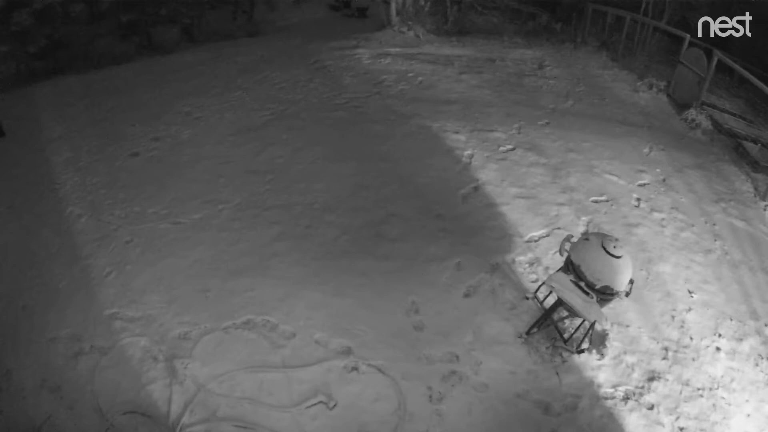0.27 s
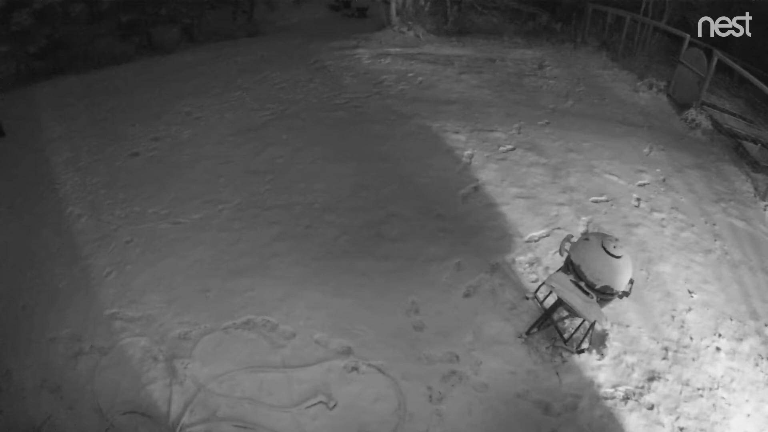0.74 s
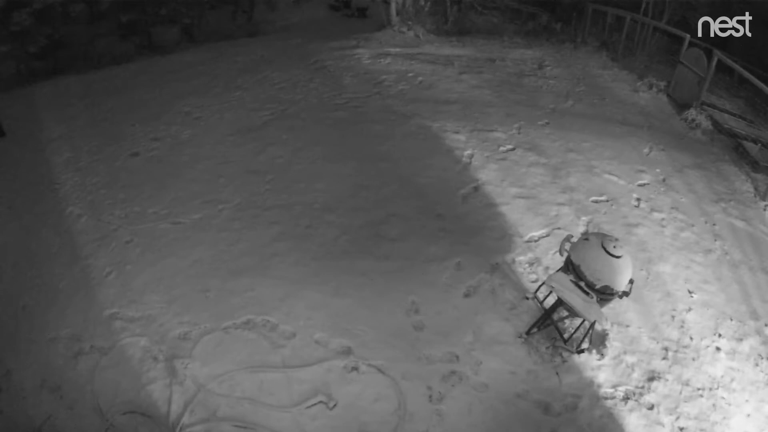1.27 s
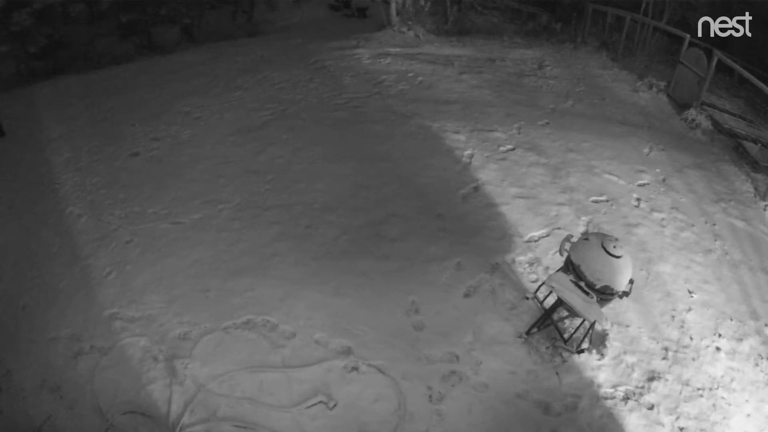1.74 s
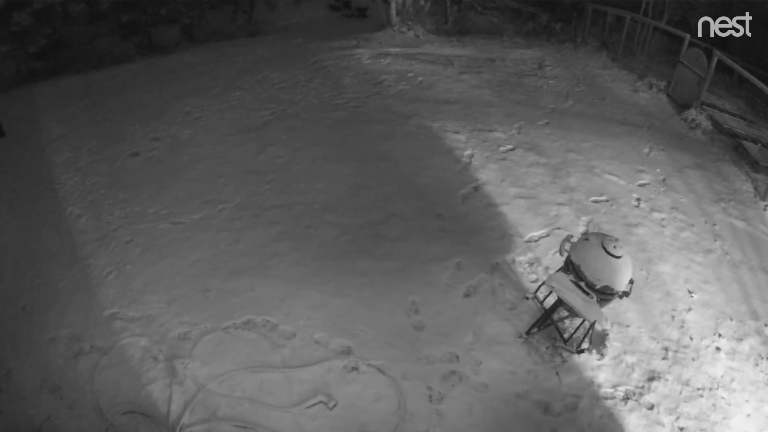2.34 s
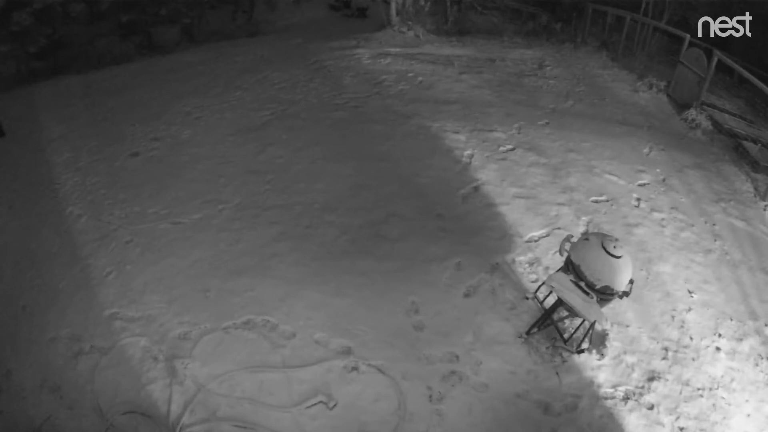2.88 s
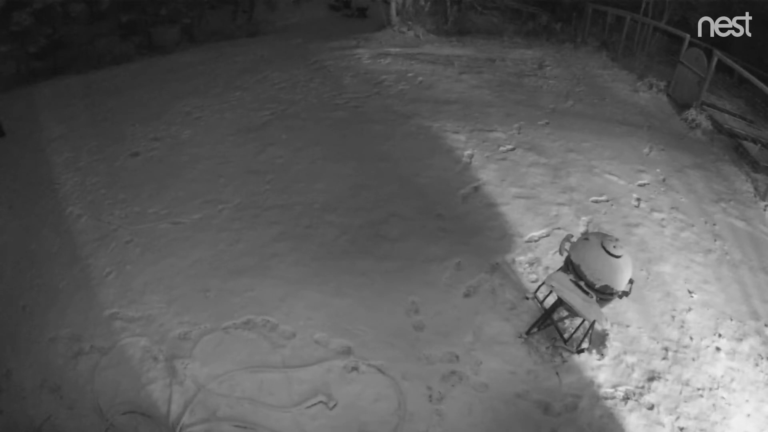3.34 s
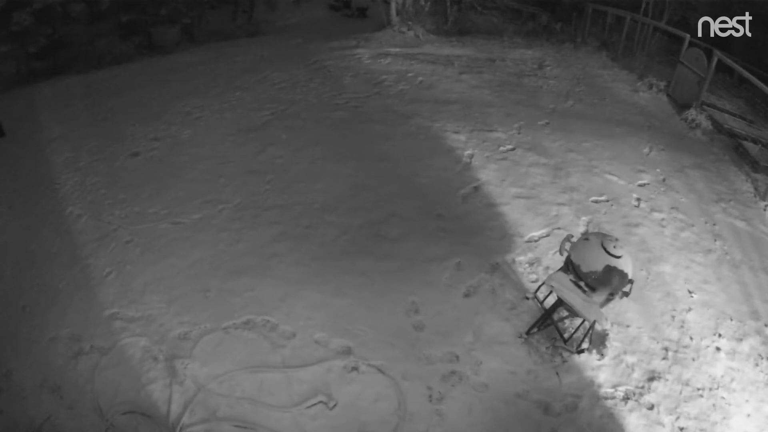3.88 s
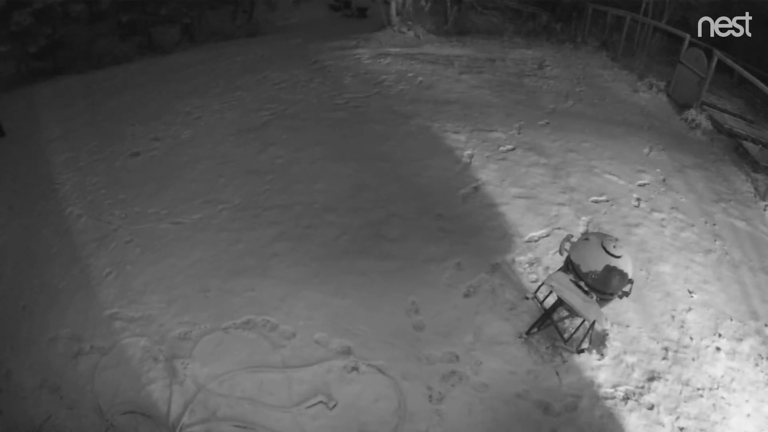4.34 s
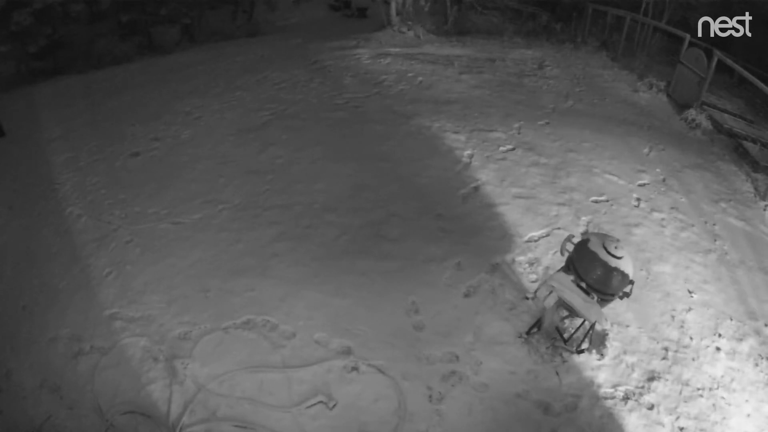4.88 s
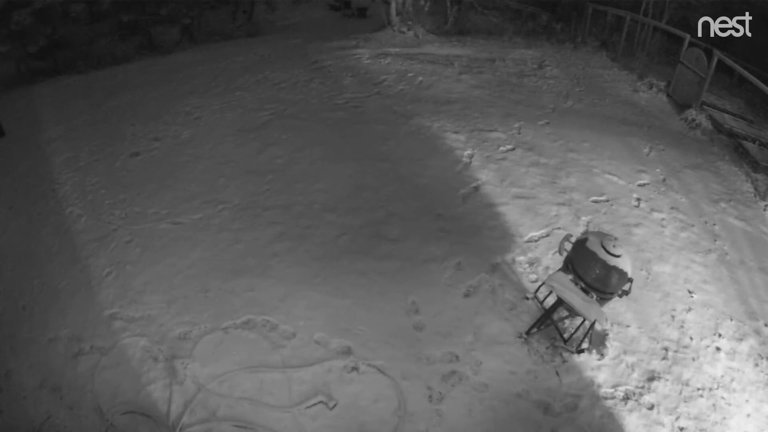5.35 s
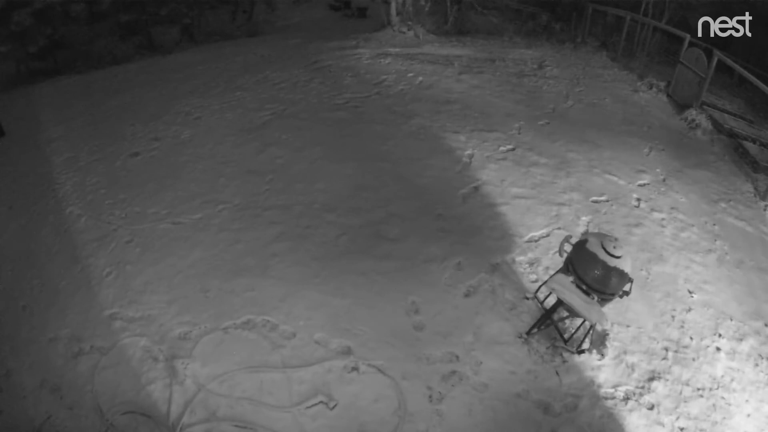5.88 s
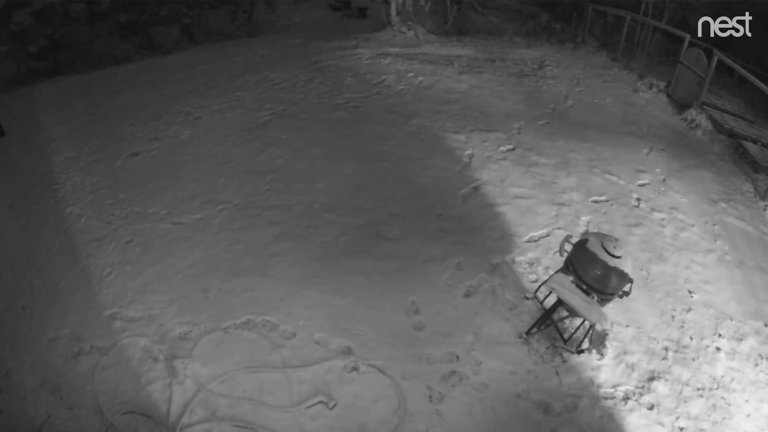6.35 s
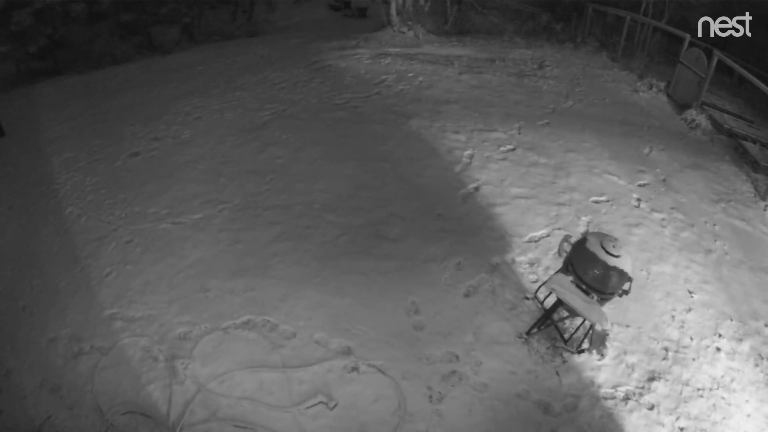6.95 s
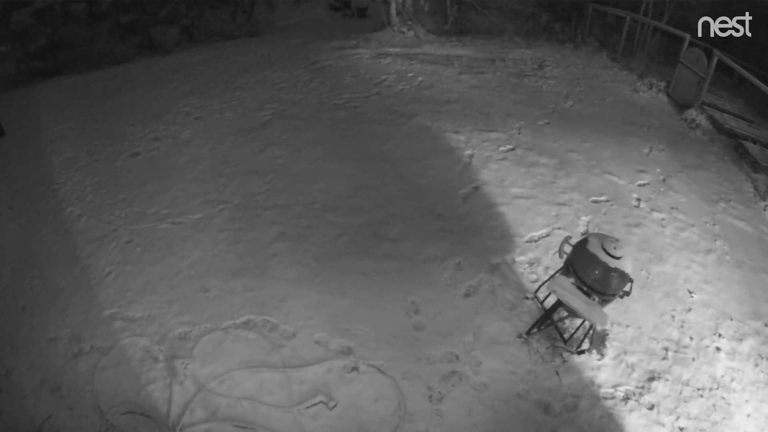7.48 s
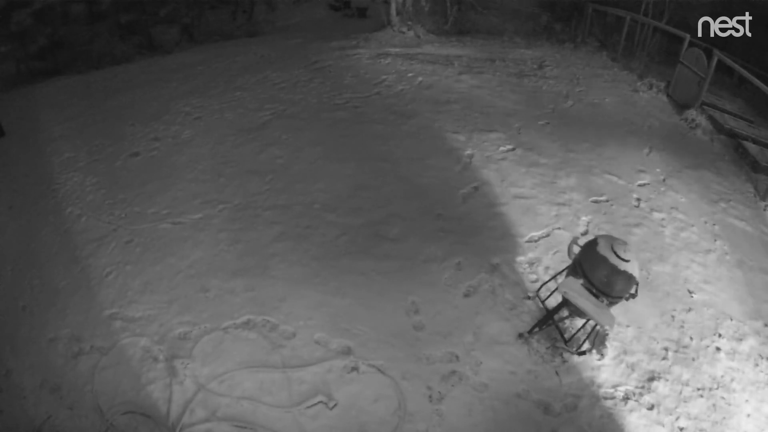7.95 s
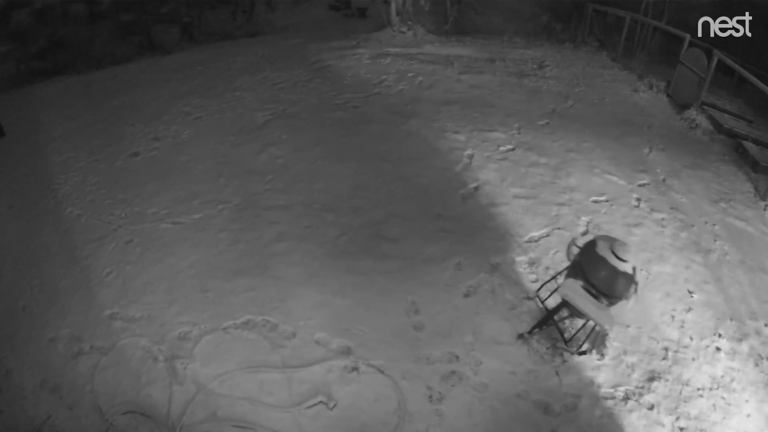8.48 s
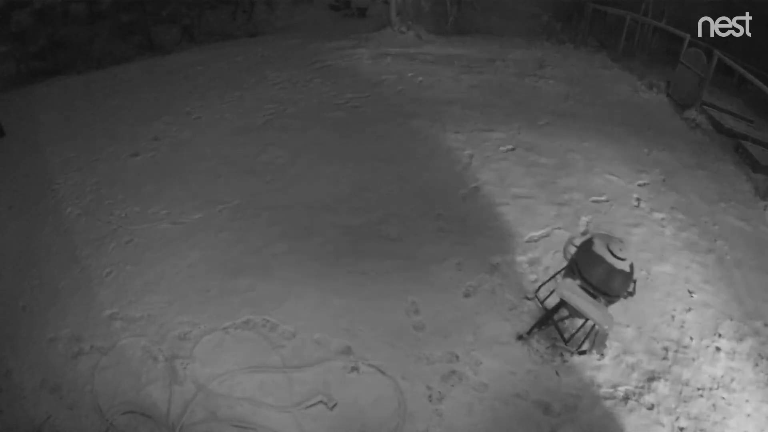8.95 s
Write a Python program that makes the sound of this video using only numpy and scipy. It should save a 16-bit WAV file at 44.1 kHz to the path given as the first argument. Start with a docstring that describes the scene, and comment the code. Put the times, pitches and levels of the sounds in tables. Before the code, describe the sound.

A tiny camera microphone on a house's outside wall picks up an earthquake, close, dry and mono, with little bass and dulled top treble. From 0 to 2.8 seconds it is fairly quiet: brittle cladding creaks in irregular lurches, small parts tick, boards rap softly, and isolated snaps crack near 0.1, 1.0 and 1.1 seconds. Around 2.9 the creaking surges, and from 3.3 to 5 sharp cracks, crunches, wooden rattling, knocks and dull thumps crowd together, with a hard snap at 4.8. From 5 to 5.7 it eases slightly, then surges again, fiercest around 6.4 to 7, with clustered snaps and bright knocks. Brief grips make the rattle dip for an instant. Near 8.1 a hard piece clacks twice in a bright judder; a heavy thump and rap land at 8.5, cracks at 8.6 and 8.75, and the rattling continues to the end at about 9.2.

```python
"""Outside wall of a house in an earthquake, heard by the small microphone of a camera fixed to that wall.
Lurch upon lurch, cladding joints creak in runs of tiny slips, boards rattle, the wall thuds low.
The frame rumbles, small parts tick, boards rap, jolts thump; hard parts knock, clack and snap.
Joints at times hold and the rattle drops away; at times they give way in a loud crunch.
The shaking grows much stronger after about three seconds."""
import sys
import numpy as np
from scipy import signal
from scipy.fft import rfft
from scipy.io import wavfile
from scipy.ndimage import uniform_filter1d

SR = 44100
rng = np.random.default_rng(int(sys.argv[2]) if len(sys.argv) > 2 else 0)


def wrap_up_sound(samples):
    """Save the sound to the file named by the first command line argument, as 16-bit audio."""
    columns = np.atleast_2d(samples).T
    # keep every value between -1 and 1, then stretch to whole-number steps
    tamed = np.clip(columns, -1, 1)
    steps = np.round(tamed * 32767).astype(np.int16)
    wavfile.write(sys.argv[1], SR, steps)


N = 405719

# spectrum of the thin, hard cladding joints: f/Hz, density/dB per Hz
JOINT_SPECTRUM = [(1400, -40), (2300, -7), (2800, -5), (3700, -3), (4300, 1.5), (4950, 0), (5500, -2.5),
                  (5750, -6), (6750, -7.5), (6900, -15.5), (7200, -34.5), (7700, -42.5)]
# spectrum of the wooden boards: f/Hz, density/dB per Hz
BOARD_SPECTRUM = [(120, -44.5), (300, -12), (550, -6), (850, -2.5), (1000, 1.5), (1300, 3), (1600, 1),
                  (2000, -1), (2500, -5), (3500, -4.5), (7000, -49.5)]
# spectrum of the heavy wall: f/Hz, density/dB per Hz
WALL_SPECTRUM = [(55, -25.5), (100, -14), (170, -9), (260, -3.5), (330, -1.5), (382, 7), (440, 0),
                 (600, -2), (1000, -13), (4000, -73.5)]
# spectrum of the house frame: f/Hz, density/dB per Hz
FRAME_SPECTRUM = [(60, -33.5), (88, -4), (132, -3.5), (165, -6), (205, -6.5), (260, -2.5), (350, -21),
                  (1000, -64.5)]


def amp(db):
    """Decibels to gain."""
    return 10 ** (np.asarray(db) / 20)


def unit(x):
    """Scales to an energy of one."""
    return x / np.sqrt(np.sum(x ** 2) + 1e-20)


def add(mix, s, sound):
    """Mixes a sound in at a time in seconds."""
    part = mix[max(round(s * SR), 0):][:len(sound)]
    part += sound[:len(part)]


def drift(per_s, size=N):
    """Straight lines between random knots of unit spread."""
    knots = np.arange(size) * per_s / SR
    return np.interp(knots, np.arange(4096), rng.standard_normal(4096))


def colour(points, size=2048):
    """The short causal (minimum-phase) pulse that has a given spectrum."""
    hz, db = np.transpose(points)
    bin_hz = abs(np.fft.fftfreq(size, 1 / SR)) + 1
    log_gain = np.log(amp(np.interp(np.log(bin_hz), np.log(hz), db)))
    spectrum = np.exp(np.conj(signal.hilbert(log_gain)))
    return np.fft.ifft(spectrum).real[:size // 2]


def ring(pulse, top_hz, t60, ring_db, scatter_s, count, size=3000):
    """One part's answer to one slip: a click, scattered in the panel, and a few modes of its own."""
    t = np.arange(size) / SR
    place, phase, damping = rng.random((3, count, 1))
    # one mode per slot up to about top_hz, each placed at random
    mode_hz = top_hz * (np.arange(count)[:, None] + 2 * place) / count
    modes = rng.standard_normal((count, 1)) * np.sin(2 * np.pi * (mode_hz * t + phase))
    modes *= amp(-60 * t / (t60 * (.5 + damping)))  # t60 in s is the average over the modes
    click = rng.standard_normal(size) * np.exp(-t / scatter_s)
    click = unit(signal.fftconvolve(click, pulse)[:size])
    modes = unit(signal.fftconvolve(modes.sum(0), pulse)[:size])
    return unit(click + amp(ring_db) * modes)


def slips(per_s, jitter, spread_db, size=N):
    """Stick and slip: uneven clicks of uneven strength, median gap 1 / per_s, with a mean power of one."""
    gap, strength = rng.standard_normal((2, size // 16))
    at = np.cumsum(np.exp(jitter * gap)) * SR / per_s
    at = (at - at[0]).astype(int)
    inside = at < size
    train = np.zeros(size)
    train[at[inside]] = amp(spread_db * np.clip(strength, -2, 2))[inside]
    return unit(train) * np.sqrt(size)


def chatter(level_db, rings, per_s, jitter, spread_db, turns_per_s, turns_db, flutter_db, count=2):
    """The load jumps from part to part, a few at a time; each slips for a moment and rings in its own way."""
    out = np.zeros(N)
    level = amp(level_db + flutter_db * drift(70)) / np.sqrt(count)
    for _ in range(count):
        run = level * slips(per_s, jitter, spread_db)
        length, strength, part = rng.random((3, 1024))
        edges = np.append(0, np.cumsum(.5 + length) * SR / turns_per_s).astype(int)
        for start, end, push, pick in zip(edges[edges < N], edges[1:], strength, part):
            turn = signal.fftconvolve(run[start:end], rings[int(pick * len(rings))])
            add(out, start / SR, amp(turns_db * (2 * push - 1)) * turn)
    # uneven turns leave the mean power as it was
    return out / np.sqrt(np.mean(amp(turns_db * np.linspace(-1, 1)) ** 2))


def shaking(tremor_boards_db=1.5, build_up=1.63, crest_shape=1.44):
    """Levels of the joints and of the boards in dB: every lurch adds its power to the tremor."""
    # tremor that never lets the house rest: t/s, joint level/dB
    tremor = [(0.0, -53.5), (0.3, -50), (0.95, -57.5), (1.9, -56), (2.75, -54), (3.1, -53), (4.3, -44.5),
              (5.1, -44), (5.6, -43), (6.68, -50), (7.7, -48.5), (8.33, -62), (8.6, -54.5), (9.2, -54.5)]
    # lurches of the house: crest t/s, joint level/dB, ebb/s, boards relative to joints/dB
    lurches = [(0.065, -40, 0.011, -30), (0.37, -39, 0.031, -19), (0.65, -42.5, 0.027, -9.5),
               (0.778, -41.5, 0.0064, -16), (0.835, -50.5, 0.022, 2), (1.123, -42, 0.023, -1),
               (1.227, -43, 0.0071, -25), (1.44, -49, 0.072, -9.5), (1.673, -49.5, 0.071, 2),
               (1.812, -41, 0.017, -2.5), (1.889, -43.5, 0.037, -2.5), (1.994, -42.5, 0.038, -18),
               (2.18, -47.5, 0.03, -0.5), (2.467, -38, 0.011, -13), (2.592, -42.5, 0.016, -4),
               (2.708, -51, 0.019, -5), (2.897, -34, 0.037, -7), (3.043, -34, 0.021, -5.5),
               (3.151, -31, 0.023, -7.5), (3.237, -41.5, 0.099, -2), (3.329, -39, 0.09, -1.5),
               (3.552, -36.5, 0.025, 3), (3.651, -29, 0.019, -4.5), (3.716, -38.5, 0.037, -2.5),
               (3.785, -37, 0.0072, 1), (3.939, -30.5, 0.02, -1.5), (4.094, -29, 0.0062, -1.5),
               (4.201, -37.5, 0.23, -2), (4.388, -35, 0.031, -2.5), (4.546, -30.5, 0.031, -6),
               (4.588, -33, 0.023, -4), (4.718, -35.5, 0.044, -2.5), (4.801, -31, 0.035, -0.5),
               (5.134, -35, 0.0061, -6), (5.221, -35.5, 0.012, -4), (5.265, -42, 0.021, 6.5),
               (5.376, -37.5, 0.026, -2.5), (5.549, -40, 0.066, -3), (5.723, -46, 0.023, 8.5),
               (5.839, -28, 0.042, -7.5), (5.976, -35, 0.12, -3), (6.238, -27.5, 0.033, -4.5),
               (6.303, -38, 0.031, 2), (6.451, -35.5, 0.041, -1.5), (6.605, -26, 0.033, -6),
               (6.748, -25, 0.016, -3.5), (6.879, -35, 0.034, -1.5), (6.931, -30, 0.02, 0),
               (7.003, -43.5, 0.098, 6.5), (7.144, -31.5, 0.032, -1), (7.259, -37.5, 0.036, 1),
               (7.347, -30.5, 0.026, -2), (7.469, -33.5, 0.019, -3.5), (7.574, -35.5, 0.075, -3.5),
               (7.691, -28, 0.025, -0.5), (7.819, -31.5, 0.048, 3.5), (8.008, -43, 0.32, 4),
               (8.201, -31, 0.05, -4.5), (8.26, -38, 0.026, 2.5), (8.51, -39.5, 0.028, 4.5),
               (8.582, -25, 0.016, -4.5), (8.631, -38.5, 0.14, 5), (8.751, -30, 0.032, -0.5),
               (8.878, -44, 0.048, 5), (9.048, -33.5, 0.033, 1), (9.108, -40.5, 0.028, 0),
               (9.164, -38.5, 0.12, 3)]
    t = np.arange(N) / SR
    joints = amp(np.interp(t, *np.transpose(tremor))) ** 2
    boards = joints * amp(tremor_boards_db) ** 2
    for s, db, ebb, boards_db in lurches:
        near = slice(*np.searchsorted(t, [s - 4 * ebb, s + 4 * ebb]))
        # strain builds build_up times slower than it ebbs
        away = np.maximum((s - t[near]) / build_up, t[near] - s) / ebb
        # crest_shape: 1 = pointed crest, 2 = round
        power = (amp(db) * np.exp(-away ** crest_shape)) ** 2
        joints[near] += power
        boards[near] += power * amp(boards_db) ** 2
    return 10 * np.log10(joints), 10 * np.log10(boards)


def gripping():
    """How far the rattle drops, in dB, while the joints hold."""
    # moments of grip: middle t/s, drop/dB, time from the middle to half that drop/s
    lulls = [(0.038, 10, 0.013), (0.948, 6, 0.012), (1.33, 1, 0.036), (2.098, 1, 0.018),
             (3.451, 19, 0.0072), (3.84, 6, 0.0087), (4.335, 6, 0.0088), (4.456, 7, 0.033),
             (5.07, 7, 0.036), (5.172, 16, 0.01), (5.683, 2.5, 0.013), (6.122, 4, 0.021), (6.678, 7, 0.016),
             (7.2, 4, 0.011), (7.411, 7, 0.0094), (8.083, 5.5, 0.015), (8.31, 5.5, 0.025),
             (8.968, 5.5, 0.019)]
    t = np.arange(N) / SR
    return sum(db / (1 + np.square(np.square((t - s) / half))) for s, db, half in lulls)


def rumbling(lumps_per_s=9, lumps_db=7):
    """The frame shifts on the trembling ground in dull, uneven lumps."""
    # frame's rumble ahead of its lumps: t/s, level/dB
    rumble = [(0, -79), (1.0, -79), (1.5, -78.5), (3.0, -73), (4.6, -68.5), (6.2, -67.5), (9.2, -70)]
    pulse = colour(FRAME_SPECTRUM, size=8192)
    rings = [ring(pulse, 180, t60=0.039, ring_db=-8.5, scatter_s=0.00063, count=8) for _ in range(12)]
    level_db = np.interp(np.arange(N) / SR, *np.transpose(rumble))
    level_db += lumps_db * np.minimum(drift(lumps_per_s), 1)
    return chatter(level_db, rings, per_s=200, jitter=0.77, spread_db=8.0,
                   turns_per_s=5.8, turns_db=1.5, flutter_db=3.0)


def thudding(boards_db, follows=0.83, pivot_db=-39.5, below_db=-13):
    """The wall takes the boards' blows and answers low."""
    pulse = colour(WALL_SPECTRUM)
    rings = [ring(pulse, 800, t60=0.024, ring_db=-14.0, scatter_s=0.0036, count=14) for _ in range(50)]
    # the heavy wall gains `follows` dB for each dB of the boards, about the pivot
    level_db = pivot_db + follows * (boards_db - pivot_db) + below_db
    return chatter(level_db, rings, per_s=230, jitter=.8, spread_db=3.5,
                   turns_per_s=20, turns_db=2.0, flutter_db=1.5)


def ticking(joints_db, per_s=28, above_db=19, spread_db=3, board_db=-5, hardest_db=-36):
    """Small loose parts tap now and then, each in its own voice, harder with the shaking, up to a limit."""
    out = np.zeros(N)
    pulse = unit(colour(JOINT_SPECTRUM)) + amp(board_db) * unit(colour(BOARD_SPECTRUM))
    times = np.cumsum(rng.exponential(1 / per_s, size=400))
    for s, push in zip(times, np.clip(rng.standard_normal(len(times)), -2, 2)):
        tap = ring(pulse, 7400, t60=0.017, ring_db=-4.5, scatter_s=0.00043, count=14, size=1500)
        load_db = min(joints_db[min(int(s * SR), N - 1)], hardest_db)
        add(out, s, amp(load_db + above_db + spread_db * push) * tap)
    return out


def rattling(boards_db, gain_db=-1.17):
    """Boards and loose things knock against each other."""
    pulse = colour(BOARD_SPECTRUM)
    rings = [ring(pulse, 3225, t60=0.034, ring_db=-8.5, scatter_s=0.0024, count=30) for _ in range(70)]
    return chatter(boards_db + gain_db, rings, per_s=330, jitter=.7, spread_db=2,
                   turns_per_s=35, turns_db=3.5, flutter_db=0.5)


def thumps(length_s=0.027, gain_db=2.5, board_db=-1, frame_db=-14):
    """A jolt bumps the wall: a short, dull cluster of knocks that boards and frame share."""
    # jolts on the wall: t/s, level/dB before gain_db
    jolts = [(0.126, -46), (0.38, -52), (1.419, -59), (1.72, -57), (3.557, -49), (3.643, -40.5),
             (3.759, -45.5), (4.088, -41), (4.232, -49), (4.599, -41.5), (4.72, -45), (4.939, -47.5),
             (5.258, -46.5), (5.375, -46), (5.447, -42.5), (6.227, -49), (6.588, -37), (6.92, -46),
             (7.02, -46), (8.01, -45.5), (8.412, -44.5), (8.505, -30.5), (8.766, -39)]
    out, t = np.zeros(N), np.arange(SR // 6) / SR
    pulse = unit(colour(WALL_SPECTRUM))
    pulse = pulse + amp(board_db) * unit(colour(BOARD_SPECTRUM)) + amp(frame_db) * unit(colour(FRAME_SPECTRUM))
    force = np.exp(-(t / length_s) ** 2)
    for s, db in jolts:
        cluster = force * slips(per_s=200, jitter=0.36, spread_db=0.5, size=len(t))
        answer = ring(pulse, 1600, t60=0.045, ring_db=-6, scatter_s=0.0026, count=16)
        sound = unit(signal.fftconvolve(cluster, answer))
        add(out, s, amp(db + gain_db) * np.linalg.norm(force) * sound)
    return out


def raps(gain_db=24, wall_db=-14):
    """A loose board raps once and rings briefly, each time on its own few woody notes."""
    # single raps: t/s, level/dB before gain_db
    strikes = [(0.506, -46.5), (0.8152, -43.5), (1.526, -48), (1.982, -45), (2.5825, -43.5), (3.151, -35),
               (3.779, -34.5), (4.0145, -50), (4.095, -28), (4.2343, -37), (4.5114, -33), (5.826, -33),
               (6.23, -30), (7.34, -33), (8.509, -28)]
    out = np.zeros(N)
    pulse = unit(colour(BOARD_SPECTRUM)) + amp(wall_db) * unit(colour(WALL_SPECTRUM))
    for s, db in strikes:
        answer = ring(pulse, 2000, t60=0.039, ring_db=0.5, scatter_s=0.0039, count=12)
        add(out, s, amp(db + gain_db) * answer)
    return out


def clacks(rise_s=0.0015):
    """A hard piece judders against its seat, rings in a few bright modes, and its juddering stops dead."""
    # clacks of a hard piece: t/s, level/dB, length/s
    judders = [(8.1053, -25.5, 0.021), (8.146, -26.5, 0.009)]
    # modes of that piece: f/Hz, relative level/dB, t60/s
    bright_modes = [(2700, -3, 0.04), (3280, -3, 0.034), (4320, 4, 0.044), (4900, 8.5, 0.039),
                    (5920, 0.5, 0.014), (6600, -15, 0.016)]
    out, t = np.zeros(N), np.arange(3000) / SR
    for s, db, length in judders:
        force = (1 - np.exp(-t / rise_s)) * np.exp(-(t / length) ** 6)
        run = force * slips(per_s=1300, jitter=0.41, spread_db=0, size=len(t))
        sound = 0
        for hz, mode_db, t60 in bright_modes:
            mode = np.sin(2 * np.pi * hz * t) * amp(-60 * t / t60)
            sound = sound + amp(mode_db) * unit(signal.fftconvolve(run, mode))
        add(out, s, amp(db) * np.linalg.norm(force) * unit(sound))
    return out


def knocks(rise_s=0.0025, length_s=0.013, t60=0.018, gain_db=2.5, joint_db=-7, board_db=-10):
    """A loose part strikes, chatters to rest on its own note, and jars the cladding and boards."""
    # knocks of loose parts: t/s, level/dB before gain_db, note f/Hz
    strikes = [(0.125, -30.5, 4420), (1.205, -47, 4150), (1.266, -41.5, 4700), (2.352, -50, 4440),
               (2.581, -54, 3640), (3.147, -35, 4100), (3.485, -35, 3840), (3.926, -30.5, 5250),
               (4.068, -28, 5570), (4.776, -30, 5640), (4.785, -27.5, 4030), (4.995, -30.5, 4300),
               (5.152, -42, 4460), (5.705, -34, 1560), (5.857, -31.5, 4050), (6.389, -26.5, 4280),
               (6.432, -36, 5000), (6.487, -27.5, 4840), (6.749, -26, 4180), (6.804, -30, 4240),
               (6.953, -28, 4200), (7.343, -41, 5160), (7.489, -29.5, 3930), (7.689, -26.5, 2680),
               (7.807, -28.5, 3250), (8.064, -36, 3240), (8.148, -27.5, 2890), (8.253, -39, 3750),
               (8.616, -33, 3720), (9.044, -27.5, 2930)]
    out, t = np.zeros(N), np.arange(3000) / SR
    # joint and board levels are relative to the note
    pulse = amp(joint_db) * unit(colour(JOINT_SPECTRUM)) + amp(board_db) * unit(colour(BOARD_SPECTRUM))
    force = (1 - np.exp(-t / rise_s)) * np.exp(-(t / length_s) ** 2)
    for s, db, hz in strikes:
        run = force * slips(per_s=900, jitter=0.6, spread_db=-1.0, size=len(t))
        note = np.sin(2 * np.pi * hz * t) * amp(-60 * t / t60)
        jar = ring(pulse, 7400, t60=0.02, ring_db=-6.0, scatter_s=0.00023, count=14)
        sound = unit(signal.fftconvolve(run, note))
        sound = sound + np.linalg.norm(pulse) * unit(signal.fftconvolve(run, jar))
        add(out, s, amp(db + gain_db) * np.linalg.norm(force) * unit(sound))
    return out


def snaps(gain_db=6.5, board_db=-8, creep_s=0.0027, creep_db=-7):
    """A joint creeps for a moment, then one sudden slip cracks through cladding and board at once."""
    # single hard snaps: t/s of the sudden slip, level/dB before gain_db
    cracks = [(0.0624, -26.5), (0.1271, -11.5), (0.9825, -20), (1.1315, -19), (1.266, -27.5),
              (2.0064, -27.5), (2.8523, -16), (3.3155, -10), (3.486, -13), (3.5299, -13), (4.087, -11),
              (4.81, -6), (4.821, -13), (4.8802, -14), (5.0018, -18), (5.1278, -20), (5.7085, -25.5),
              (6.4898, -12.5), (6.5758, -8), (6.587, -11), (6.6185, -8), (6.7536, -9.5), (6.8077, -14),
              (6.947, -5.5), (7.126, -12), (7.3536, -10.5), (7.426, -20), (7.4936, -15), (8.152, -17),
              (8.26, -17), (8.6076, -6.5), (8.7123, -16), (8.7558, -5), (8.8576, -17)]
    out = np.zeros(N)
    pulse = unit(colour(JOINT_SPECTRUM)) + amp(board_db) * unit(colour(BOARD_SPECTRUM))
    before = np.arange(SR // 40)[::-1] / SR  # seconds left until the snap
    for s, db in cracks:
        creep = np.exp(-before / creep_s) * slips(per_s=1300, jitter=0.64, spread_db=0.5, size=len(before))
        run = amp(creep_db) * unit(creep)
        run[-1] += 1  # the sudden slip
        answer = ring(pulse, 7400, t60=0.016, ring_db=-3, scatter_s=0.0009, count=24)
        add(out, s - before[0], amp(db + gain_db) * unit(signal.fftconvolve(run, answer)))
    return out


def creaking(joints_db, gain_db=0.37):
    """Thin, hard cladding rubs at its joints."""
    pulse = colour(JOINT_SPECTRUM)
    rings = [ring(pulse, 7380, t60=0.0039, ring_db=-8.0, scatter_s=0.00011, count=45, size=1500)
             for _ in range(80)]
    return chatter(joints_db + gain_db, rings, per_s=560, jitter=.8, spread_db=4.5,
                   turns_per_s=30, turns_db=4, flutter_db=1.5)


def crunches(creak_db=0.3, wall_db=-13, rise_s=0.0022):
    """A joint lets go: a fast run of slips swells, dies, and shakes the board and wall behind it."""
    # joints giving way: t/s, level/dB, length/s, board relative to that level/dB
    releases = [(0.119, -29.5, 0.008, -8), (0.363, -35.5, 0.054, -12), (0.538, -41.5, 0.035, -7.5),
                (0.962, -40, 0.034, -10), (1.262, -41.5, 0.0096, -8), (2.065, -33.5, 0.011, -32),
                (2.843, -32, 0.029, -23), (3.313, -32.5, 0.025, 1), (3.482, -30, 0.034, -19),
                (3.522, -19, 0.022, -15), (3.765, -28.5, 0.046, -13), (4.06, -30, 0.039, -13.5),
                (4.492, -29, 0.035, -4.5), (4.807, -24, 0.017, -3), (4.862, -31, 0.028, -10),
                (4.985, -31, 0.022, -10.5), (5.182, -40, 0.035, 1), (5.403, -27, 0.01, -22),
                (5.82, -31.5, 0.01, 2), (6.384, -22.5, 0.0072, -14), (6.492, -35, 0.026, -2),
                (6.569, -34, 0.017, -15), (6.801, -29.5, 0.026, -9), (6.944, -28, 0.019, -8),
                (7.121, -31, 0.017, -12), (7.223, -33.5, 0.034, 5), (7.423, -31.5, 0.017, -8),
                (7.491, -36, 0.016, -13), (7.801, -34.5, 0.022, 1), (8.117, -40.5, 0.067, 6),
                (8.144, -37, 0.018, 1), (8.4, -39.5, 0.072, -5), (8.605, -26, 0.016, -4),
                (8.705, -27.5, 0.017, -11), (8.988, -34.5, 0.045, -9.5)]
    out = np.zeros(N)
    joint, board, wall = colour(JOINT_SPECTRUM), colour(BOARD_SPECTRUM), colour(WALL_SPECTRUM)
    t = np.arange(SR // 6) / SR
    for s, db, length, body_db in releases:
        force = (1 - np.exp(-t / rise_s)) * np.exp(-(t / length) ** 5)
        force /= force.max()
        run = force * slips(per_s=1100, jitter=.6, spread_db=3.0, size=len(t))
        parts = [(creak_db, ring(joint, 7400, t60=0.0044, ring_db=-17.0, scatter_s=0.0002, count=36)),
                 (body_db, ring(board, 3200, t60=0.0067, ring_db=-6.5, scatter_s=0.001, count=20)),
                 (body_db + wall_db, ring(wall, 800, t60=0.058, ring_db=-9.5, scatter_s=0.00034, count=10))]
        for part_db, answer in parts:
            sound = unit(signal.fftconvolve(run, answer))
            add(out, s, amp(db + part_db) * np.linalg.norm(force) * sound)
    return out


def wander(x, turns_per_s=7, spread_s=0.013, size=2048):
    """The colour wanders: as the slipping place moves, narrow peaks and notches come and go."""
    # depth of the wandering ahead of the cap on peaks: f/Hz, spread/dB
    depth = [(900, 2.5), (2200, 7.5), (4000, 10.5), (7000, 12.5)]
    hz, s, z = signal.stft(x, SR, nperseg=size, noverlap=size * 3 // 4)
    place = s * turns_per_s
    last, blend = place.astype(int), place % 1 * np.pi / 2
    # each place has its own random set of delayed paths
    delay = np.arange(size) / SR
    fading = unit(np.exp(-delay / spread_s) * (delay > .0006))
    paths = rng.standard_normal((last[-1] + 2, size)) * fading
    ripple = rfft(paths).real.T * np.sqrt(2)
    ripple = ripple[:, last] * np.cos(blend) + ripple[:, last + 1] * np.sin(blend)
    # notches go deeper than peaks rise
    gain = amp(np.minimum(ripple, 1) * np.interp(hz, *np.transpose(depth))[:, None])
    gain /= np.sqrt(uniform_filter1d(gain ** 2, size=61, axis=0))  # evens the gain over wide bands
    # minimum phase: rings after a hit, never before
    both_sides = np.log(np.vstack([gain, gain[-2:0:-1]]))
    phase = -signal.hilbert(both_sides, axis=0).imag[:len(hz)]
    return signal.istft(z * gain * np.exp(1j * phase), SR, nperseg=size, noverlap=size * 3 // 4)[1][:N]


def scene():
    """The whole house, in one channel."""
    grip_db = gripping()
    joints_db, boards_db = np.array(shaking()) - grip_db
    chattering = rumbling() * amp(-grip_db) + thudding(boards_db) + ticking(joints_db)
    chattering = chattering + rattling(boards_db) + creaking(joints_db)
    blows = thumps() + raps() + clacks() + knocks() + snaps()
    blows = blows + wander(crunches(), spread_s=0.0061)
    return (wander(chattering) + blows)[None]


def suppress(x, bass_below_db=-35.5, floor_db=-90, corner_hz=220, size=1024):
    """The camera's noise suppressor shuts every weak band, and shuts the bass when the rest drowns it."""
    hz, _, z = signal.stft(x, SR, nperseg=size, noverlap=size * 3 // 4)
    power = uniform_filter1d(abs(z) ** 2, size=17, axis=-1)
    # in the bass the limit rises with the total power
    total = power.sum(-2, keepdims=True)
    bass = total * amp(bass_below_db) ** 2 / (1 + (hz[:, None] / corner_hz) ** 8)
    limit = amp(floor_db) ** 2 + bass
    z = z / (1 + (limit / (abs(power) + 1e-16)) ** 6)
    return signal.istft(z, SR, nperseg=size, noverlap=size * 3 // 4)[1][:, :N]


def record(dry, bass_hz=90, edge_hz=7550):
    """A tiny microphone without bass, noise suppression, and a narrow band limit."""
    thin = signal.sosfilt(signal.butter(6, bass_hz, "high", fs=SR, output="sos"), dry)
    band_limit = signal.firwin(401, edge_hz, window=("kaiser", 9), fs=SR)
    return signal.oaconvolve(suppress(thin), band_limit[None], "same")


dry = scene()
out = record(dry)
wrap_up_sound(out)
```